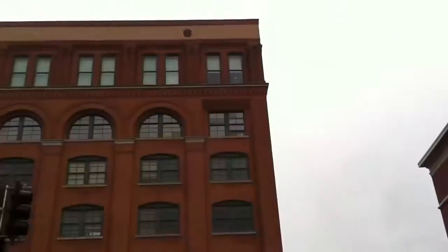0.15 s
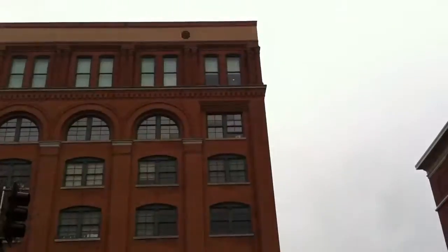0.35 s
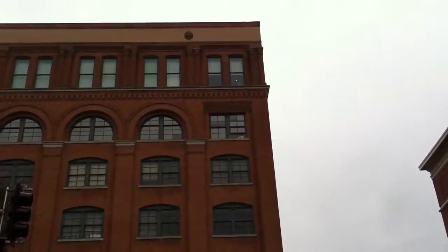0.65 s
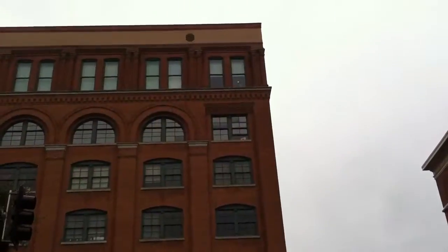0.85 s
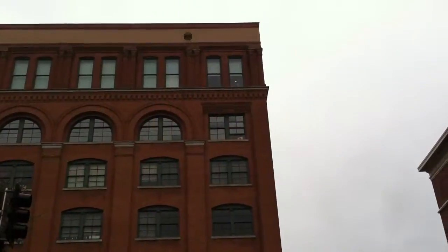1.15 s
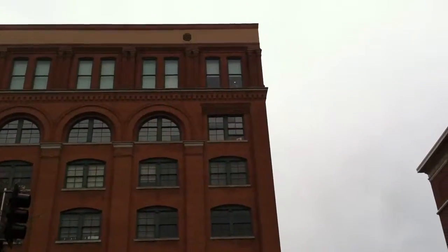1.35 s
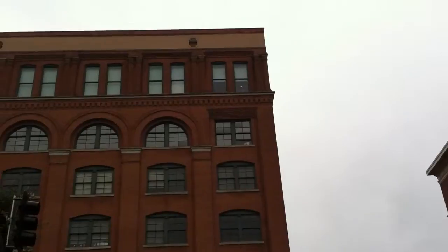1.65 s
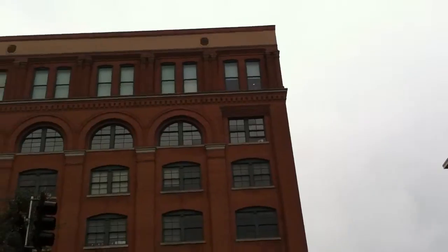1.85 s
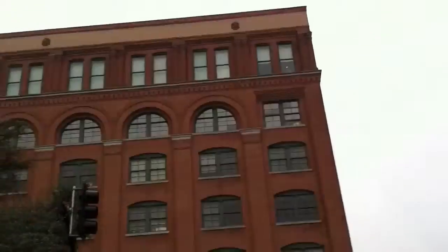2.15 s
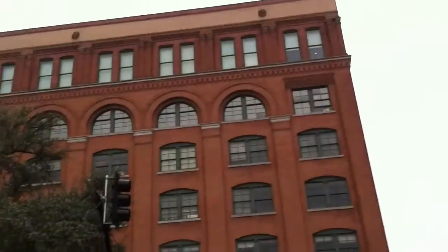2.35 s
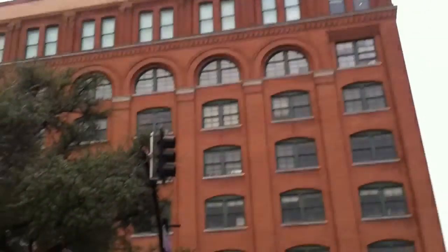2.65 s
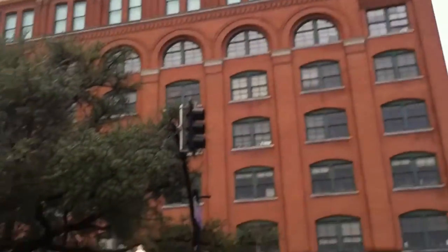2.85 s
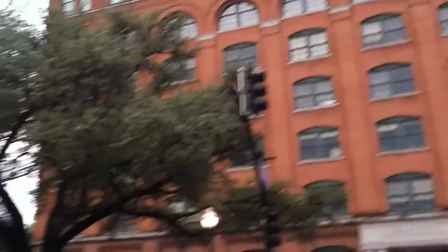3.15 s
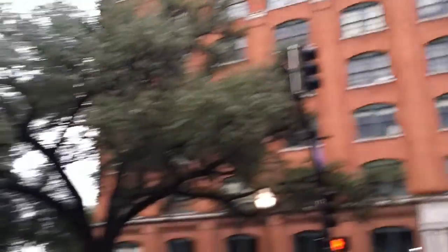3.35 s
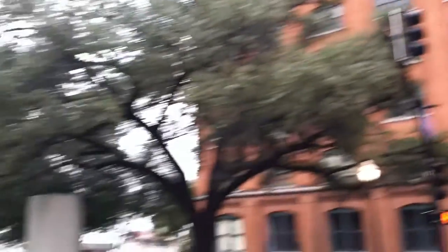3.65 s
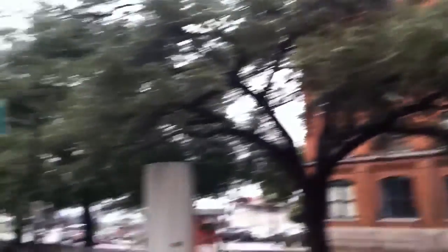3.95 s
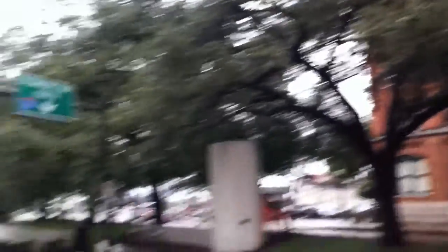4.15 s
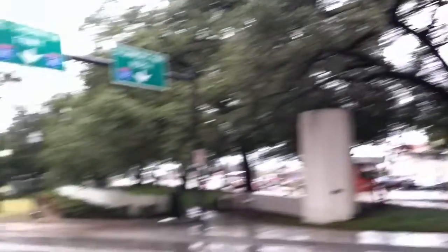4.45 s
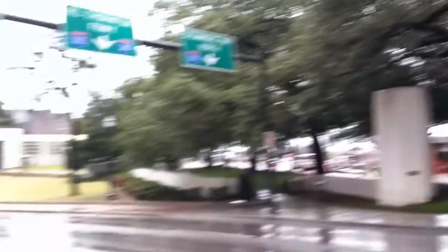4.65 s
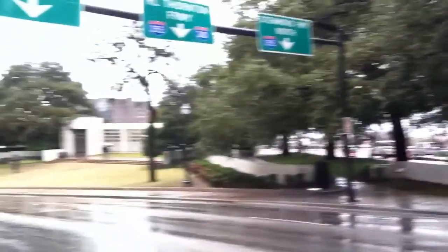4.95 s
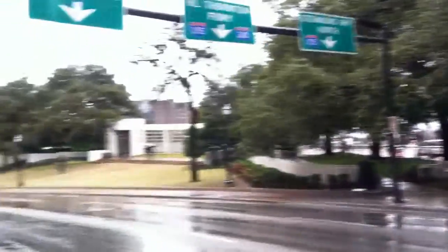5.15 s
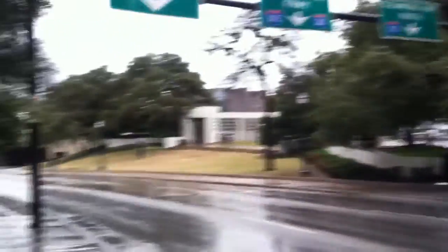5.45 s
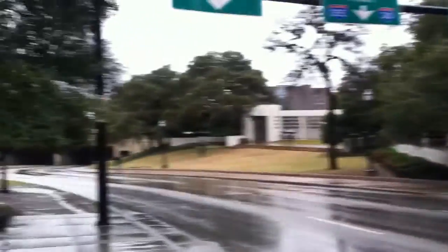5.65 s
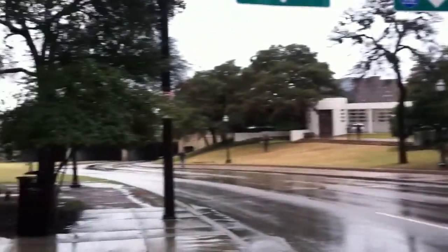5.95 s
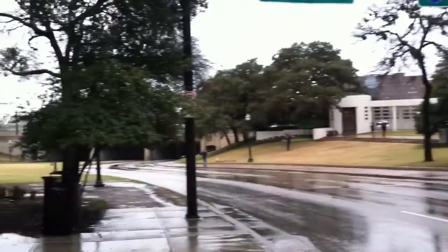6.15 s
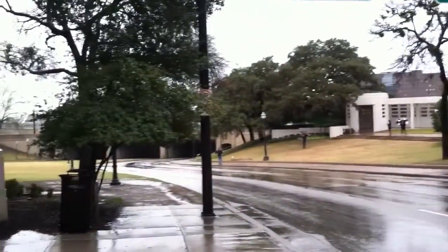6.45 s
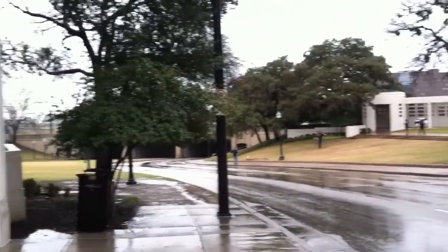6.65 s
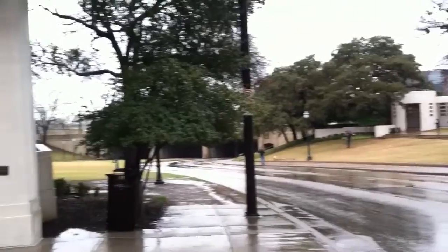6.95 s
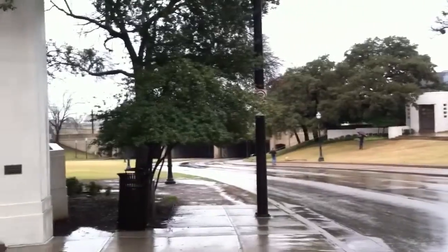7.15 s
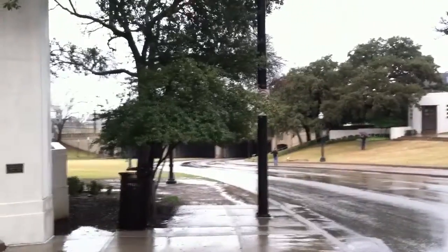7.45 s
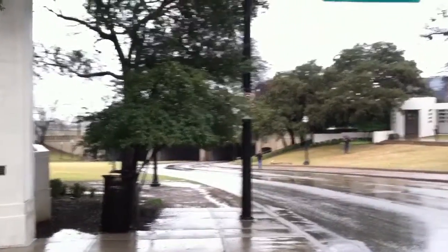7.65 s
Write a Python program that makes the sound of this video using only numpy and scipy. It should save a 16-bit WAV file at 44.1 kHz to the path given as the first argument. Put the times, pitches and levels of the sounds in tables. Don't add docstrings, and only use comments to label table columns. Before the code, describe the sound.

A fragment of a very close, booming vehicle is chopped off by a click and a tiny gap. A wet city street fades in quickly: soft engine rumble, steady tyre roar and watery hiss. Puddle splashes spit irregularly, spray grows brighter towards the middle, and a short low toot and a longer faint horn sound far off before the loudest pass. Handheld phone on the pavement.

```python
import sys
import numpy as np
from scipy import signal
from scipy.fft import rfft, irfft, next_fast_len
from scipy.io import wavfile
from scipy.ndimage import uniform_filter1d

SR = 44100
rng = np.random.default_rng(int(sys.argv[2]) if len(sys.argv) > 2 else 0)


def voltage_ratio(level):
    return 10 ** (np.asarray(level, float) / 20)


def output_pcm(signal):
    pcm = np.clip(np.atleast_2d(signal).T, -1, 1) * 32767
    wavfile.write(sys.argv[1], SR, np.round(pcm).astype(np.int16))


N = 344421
T = np.arange(N) / SR
PADDED = next_fast_len(N + SR // 2)
HZ = np.maximum(np.arange(PADDED // 2 + 1) * SR / PADDED, 1)

# frequency in Hz, gain in dB.
MIC = [(30, -30), (50, -32.5), (100, -11), (150, 0.5), (1600, 1), (2200, 7.5), (2600, 3), (3200, -4),
       (4400, -1.5), (5400, -11.5), (7000, -5.5), (8500, -8), (12000, -25.5), (15500, -40.5)]


def colour(x, shape):
    hz, db = np.transpose(shape)
    gain = voltage_ratio(np.interp(np.log(HZ), np.log(hz), db))
    return irfft(rfft(x, PADDED) * gain, PADDED)[:N]


def heard(x, db):
    return x * voltage_ratio(db) / np.std(colour(x, MIC))


def wander(rate, db):
    hold_ms = int(1000 / rate)
    levels = np.repeat(rng.standard_normal(8000 // hold_ms + 1), hold_ms)
    slow = uniform_filter1d(uniform_filter1d(levels, hold_ms), hold_ms)
    return np.interp(T, np.arange(len(slow)) / 1000, voltage_ratio(1.3 * db * slow))


def droplets(per_s, scatter_db):
    size_db = np.minimum(scatter_db * rng.exponential(size=N), 9)
    clicks = (rng.random(N) < per_s / SR) * rng.standard_normal(N) * voltage_ratio(size_db)
    return clicks / np.std(clicks)


def wash(source, shape, surge_db, flicker_db, rate):
    spectrum = rfft(colour(source, shape), PADDED)
    octaves = np.log2(HZ)
    out = 0
    for octave in np.arange(np.log2(shape[0][0]), np.log2(shape[-1][0]) + .5, .5):
        band = np.cos(np.pi * np.clip(octaves - octave, -.5, .5)) ** 2
        out = out + irfft(spectrum * band, PADDED)[:N] * wander(2 * rate, flicker_db)
    return out * wander(rate, surge_db)


def traffic():
    # frequency in Hz, density in dB per Hz.
    rumble_colour = [(20, -0.5), (220, 0.5), (330, -3), (450, -8), (900, -23)]
    roar_colour = [(200, -19), (450, -4.5), (800, 0.5), (1500, -2), (3200, -3), (4500, -18)]
    hiss_colour = [(2000, -11), (3300, -1.5), (4800, 2), (6500, -23), (12000, -27)]
    spray_colour = [(3500, -18.5), (5500, -1.5), (8000, -1), (11000, -1), (16000, 4.5)]
    # time in seconds, traffic swell in dB, facing the road (0-1).
    street = [(.15, 0.5, 0.24), (1.0, -0.1, 0.24), (1.7, -0.6, .18), (2.35, 1.1, 0), (3.1, 1, 0.02),
              (3.4, 0.5, 0.27), (3.82, 1.6, 0.13), (4.0, 0.5, 0.38), (4.3, 1.5, 0.63), (4.85, 0.7, 0.66),
              (5.25, 1.3, 0.7), (5.6, 1.5, 0.54), (5.95, 1.8, 1), (6.25, 1.2, 0.95), (6.48, 1.5, 0.82),
              (6.85, 1.5, 0.84), (7.3, 1.5, 0.75), (7.75, 4, 0.9)]
    # closest moment in seconds, tyre hiss there in dB.
    cars = [
        (1.55, -41),
        (2.85, -46),
        (6.0, -40.5),
        (7.55, -36.5),
    ]
    car_m_s, lane_m = 11.5, 6.8

    s, *columns = np.transpose(street)
    swell_db, facing = (np.interp(T, s, c) for c in columns)
    car = np.sqrt(sum(voltage_ratio(db) ** 2 / (1 + (car_m_s * (T - at) / lane_m) ** 2) for at, db in cars))

    noise = rng.standard_normal((4, N))
    film = noise[2] + 0.35 * droplets(900, scatter_db=-5.0)
    thrown = noise[3] + 0.55 * droplets(1500, scatter_db=2.0)
    rumble = wash(noise[0], rumble_colour, surge_db=0.7, flicker_db=0.97, rate=5)
    roar = wash(noise[1], roar_colour, surge_db=0.63, flicker_db=0.6, rate=7)
    hiss = wash(film, hiss_colour, surge_db=0.77, flicker_db=0.7, rate=9)
    spray = wash(thrown, spray_colour, surge_db=0.9, flicker_db=0.0, rate=12)

    rumble = heard(rumble, -39.5) * voltage_ratio(0.43 * swell_db)
    roar = heard(roar, -32) * voltage_ratio(swell_db)
    hiss = heard(hiss, 0) * np.hypot(voltage_ratio(-42 - 0.24 * swell_db - 0.8 * facing), car)
    spray = heard(spray, -50) * voltage_ratio(.1 * swell_db + 10.5 * facing)
    return rumble + roar + hiss + spray


def close_vehicle():
    # time in seconds, body boom in dB, tyre noise in dB.
    levels = [
        (0, -11.5, -22),
        (.015, -17.5, -17.5),
        (.035, -19, -19),
        (.055, -24.5, -16),
        (.068, -39, -17.5),
        (.09, -23, -22),
    ]
    # frequency in Hz, density in dB per Hz.
    boom_colour = [(30, 5), (90, 2), (160, -0.5), (300, 2.5), (500, -8), (700, -9.5), (1200, -30)]
    tyre_colour = [(400, -13.5), (1000, -4), (2000, -5.5), (2700, 2.5), (3300, -0.5), (4400, -3), (5600, 3),
                   (7500, -12), (12000, -9), (16000, -17)]

    s, boom_db, tyre_db = np.transpose(levels)
    panels = 0
    for hz, size in [(236, .8), (335, 0.39)]:
        phase = 2 * np.pi * np.cumsum(hz * wander(40, db=0.2)) / SR
        panels = panels + size * wander(60, db=2.5) * np.sin(phase)
    boom = panels + heard(colour(rng.standard_normal(N), boom_colour), -2.5)
    tyres = heard(colour(rng.standard_normal(N), tyre_colour), 0)
    return boom * voltage_ratio(np.interp(T, s, boom_db)) + tyres * voltage_ratio(np.interp(T, s, tyre_db))


def splashes():
    # centre in seconds, level in dB, length in seconds, droplet pitch in Hz.
    puddles = [(1.075, -44, .02, 4500), (1.418, -46, 0.029, 5500), (1.606, -45, 0.055, 4530),
               (1.99, -50, .03, 4500), (2.76, -46, .014, 7500), (3.945, -46, .02, 4300),
               (4.39, -47, .03, 7500), (4.593, -53, .06, 6500), (4.71, -44, 0.066, 8000),
               (4.78, -41, .012, 4800), (4.81, -39, .015, 8500), (5.09, -41.5, .012, 4900),
               (5.236, -45, .05, 8000), (5.44, -40.5, 0.044, 9500), (5.72, -41, 0.062, 8000),
               (6.175, -39.5, 0.055, 8500), (6.28, -44, .05, 8000), (6.405, -45, .04, 8000),
               (6.555, -39.5, 0.04, 7560), (6.94, -45, .045, 7000), (7.072, -44, 0.021, 5500),
               (.95, -52, 0.46, 3020), (2.8, -50, 0.15, 3000), (2.7, -59, .2, 6500),
               (3.994, -49, 0.33, 1780), (4.15, -52, .25, 8500), (5.42, -51.5, 0.31, 2130),
               (6.202, -49.5, 0.32, 2080)]
    drops = 0.58 * droplets(5000, scatter_db=6.0) + 0.83 * rng.standard_normal(N)
    out = np.zeros(N)
    for s, db, length, hz in puddles:
        near = slice(int((s - .4) * SR), int((s + .4) * SR))
        b, a = signal.butter(3, [hz * 0.65, min(hz * 1.4, .45 * SR)], "bandpass", fs=SR)
        cloud = signal.lfilter(b, a, drops[near])
        burst = np.exp(-(2 * (T[near] - s) / length) ** 2)
        out[near] += cloud / np.std(cloud) * voltage_ratio(db + 11.5) * burst
    return out


def horns():
    # start in seconds, end in seconds, pitch in Hz, level in dB.
    calls = [
        (6.132, 6.282, 452, -41),
        (6.9, 7.5, 627, -51.5),
        (7.5, 7.9, 631, -45),
    ]
    out = 0
    for start, end, hz, db in calls:
        gate = np.clip(np.minimum(T - start, end - T) / 0.055, 0, 1)
        phase = 2 * np.pi * np.cumsum(hz * wander(20, db=0.04)) / SR
        tone = np.sin(phase) + .2 * np.sin(3 * phase)
        out = out + np.sqrt(2) * voltage_ratio(db) * wander(14, db=-2.0) * gate * tone
    return out


def scene():
    street = traffic() + splashes() + horns()
    return np.where(T < .095, close_vehicle(), street)[None]


def thin_treble(x, floor_db, from_hz):
    hz, _, cells = signal.stft(x, SR, nperseg=2048)
    treble = np.abs(cells[hz > from_hz]).mean(axis=0)
    uneven_db = 2.5 * np.repeat(rng.standard_normal((65, len(treble))), 16, axis=0)[:len(hz)]
    floor = voltage_ratio(floor_db) * voltage_ratio(uneven_db) * (treble / np.median(treble)) ** .65
    keep = (np.abs(cells) > floor) | (hz[:, None] < from_hz)
    return signal.istft(cells * keep, SR, nperseg=2048)[1][:N]


def top_cut(x):
    return signal.sosfilt(signal.butter(12, 15710, fs=SR, output="sos"), x)


def record(dry):
    # time in seconds, gain in dB.
    fades = [
        (0, 0),
        (.0845, 0),
        (.08455, -22),
        (.092, -58),
        (.103, -44),
        (.11, -20),
        (.12, -6),
        (.138, 0),
    ]
    s, db = np.transpose(fades)
    x = thin_treble(colour(dry[0], MIC), floor_db=-84.5, from_hz=9000)
    x = x * voltage_ratio(np.interp(T, s, db))
    click = voltage_ratio(-22) * (np.arange(N) == int(s[1] * SR))
    return top_cut((x - click)[None])


dry = scene()
out = record(dry)
output_pcm(out)
```